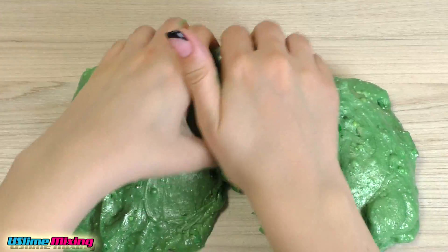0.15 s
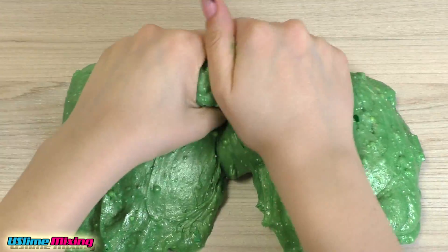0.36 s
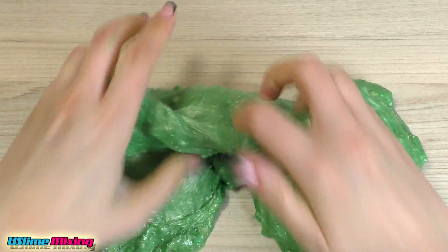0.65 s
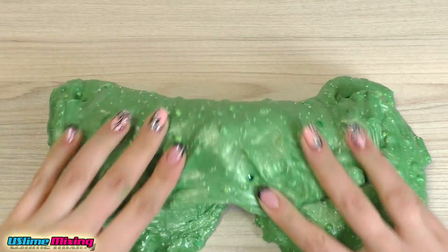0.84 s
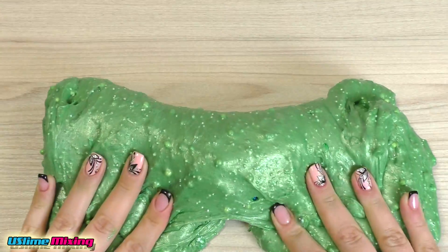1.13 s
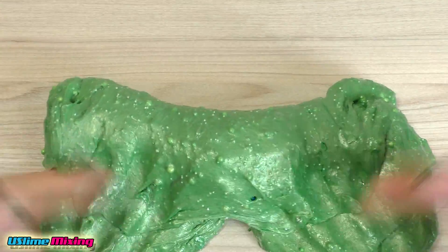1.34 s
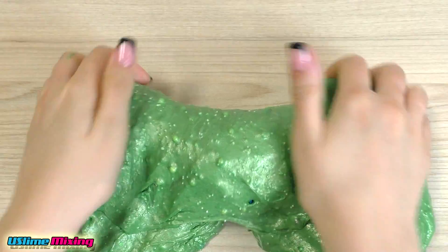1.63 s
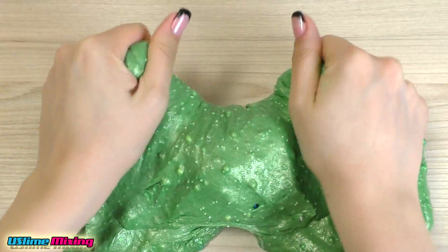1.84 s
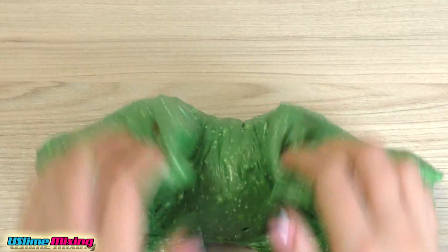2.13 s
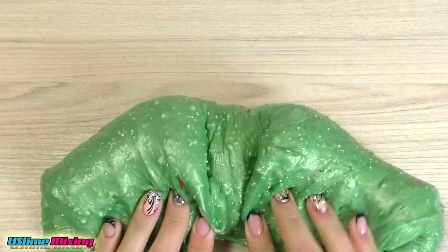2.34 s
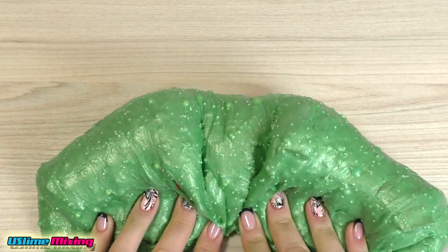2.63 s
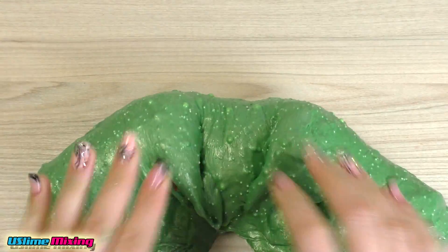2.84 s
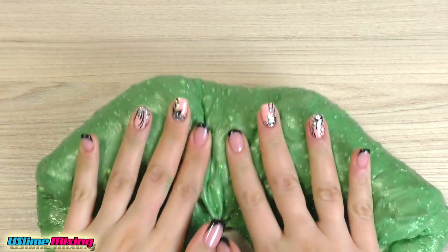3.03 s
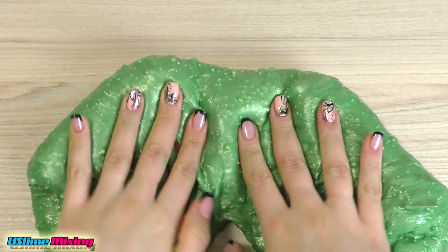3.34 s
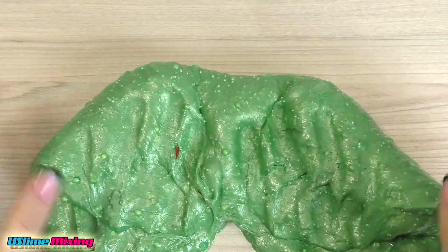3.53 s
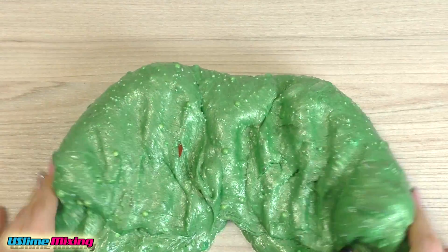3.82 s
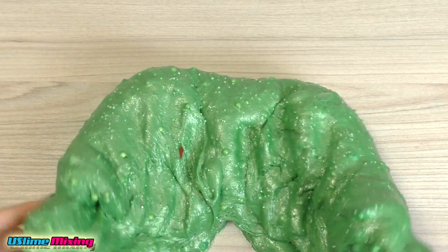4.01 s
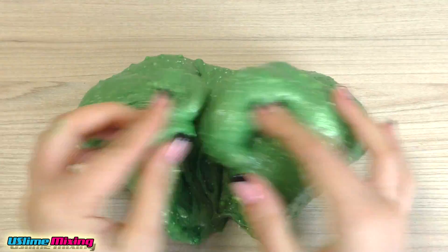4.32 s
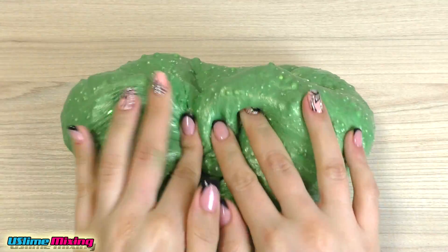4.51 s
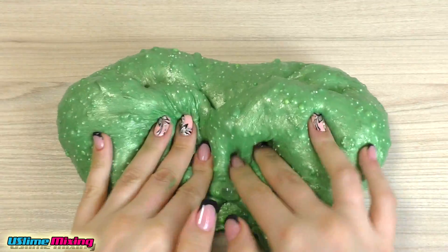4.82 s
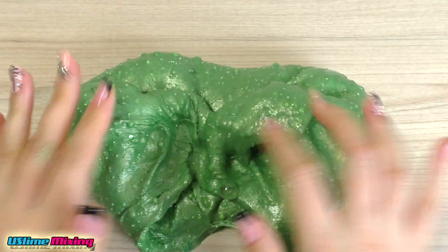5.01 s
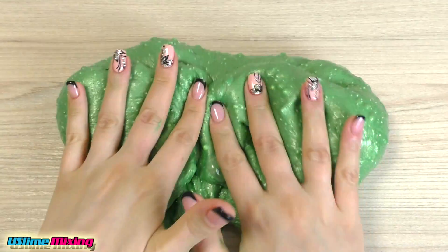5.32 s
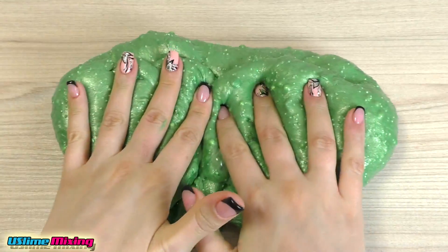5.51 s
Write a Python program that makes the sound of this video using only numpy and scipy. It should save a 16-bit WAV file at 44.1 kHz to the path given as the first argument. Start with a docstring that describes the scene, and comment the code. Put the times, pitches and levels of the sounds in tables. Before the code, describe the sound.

A close stereo take of hands kneading thick, bubbly slime on a wooden table in a small room. At 0 s a short wet tearing fizz sits over a soft thump. From 0.3 to 0.5 s comes the loudest part: a dense run of hollow bubble pops and bright snaps, with tiny squeaks, dull knocks and a hiss of escaping air. A sticky peel and smaller pops follow at 0.6-0.75 s, then near calm. At 1.4 s there is a peel and low thud; from 1.85 to 2.15 s bright, crisp crackling and a swelling rip. Two round, hollow pops land at 2.47 and 2.54 s. A thud and peel come at 2.8 s, soft presses after 3 s, another peel at 3.5 s, and table thumps near 3.7 s. Light crackles return around 3.9-4.25 s, a sharp peel with a thump at 5 s, and a soft push at 5.4 s, over faint hum.

```python
"""First comes a wet tearing fizz over a soft thump, then a lively run of hollow pops and bright snaps.
Two hands press, fold and stretch thick slime on a wooden table: bursting air pockets are decaying sines
with torn-film noise, peeling skin is a fizz of random clicks, and slits leak or whistle banded air.
Pushes sound as swelling, decaying sines: two thud tones and the table modes; a small room returns a
short noise tail of the slime, and its quiet tone and faint hum are filtered noise."""
import sys
import numpy as np
from scipy import signal
from scipy.fft import rfft, irfft, next_fast_len
from scipy.io import wavfile
from scipy.ndimage import uniform_filter1d

SR = 44100
rng = np.random.default_rng(int(sys.argv[2]) if len(sys.argv) > 2 else 0)


def int16_out(signal):
    """Quantize to a 16-bit WAV file."""
    q = np.round(np.clip(np.atleast_2d(signal).T, -1, 1) * 32767)
    wavfile.write(sys.argv[1], SR, q.astype(np.int16))


N = 249606


def undb(db):
    """Decibel definition: level to amplitude ratio."""
    return 10 ** (np.asarray(db) / 20)


def unit(x):
    """Normalisation to an RMS of 1."""
    return x / np.sqrt(np.mean(x ** 2))


def fade(t, t60):
    """Exponential decay by 60 dB in t60 seconds, never shorter than 4 ms."""
    return np.exp(-np.log(1000) * t / max(t60, .004))


def sine(hz, t):
    """Simple harmonic motion from zero phase."""
    return np.sin(2 * np.pi * hz * t)


def band(x, hz, width):
    """Single resonance, gain 1 at the centre."""
    return signal.lfilter(*signal.iirpeak(min(hz, .4 * SR), hz / width, SR), x)


def steep_band(x, hz, width):
    """Cascaded resonances: two equal ones in series have steeper skirts."""
    return band(band(x, hz, width), hz, width)


def colour(x, points):
    """Linear filtering: shapes the spectrum by (frequency [Hz], gain [dB]) points."""
    hz, db = np.transpose(points)
    size = next_fast_len(x.shape[-1])
    log_hz = np.log(np.arange(size // 2 + 1) * SR / size + 1)
    gain = undb(np.interp(log_hz, np.log(hz), db))
    return irfft(rfft(x, size) * gain, size)[..., :x.shape[-1]]


def walk(rate):
    """Slow random modulation: levels held 1 / rate s and smoothed twice, RMS 1."""
    k = int(SR / rate)
    steps = np.repeat(rng.standard_normal(N // k + 1), k)
    return unit(uniform_filter1d(uniform_filter1d(steps, k), k)[:N])


def pan_gain(pan_db):
    """Interchannel level difference, left minus right in dB."""
    return undb(np.array([[pan_db], [-pan_db]]) / 2)


def stereo(mid, side, width):
    """Mid-side principle: the side noise enters the channels with opposite signs."""
    return mid + width * side * np.array([[1], [-1]])


def add(out, s, x, pan_db=0):
    """Superposition of a short sound on both channels at time s."""
    i = max(int(s * SR), 0)
    out[:, i:i + len(x)] += x[:N - i] * pan_gain(pan_db)


def curve(rows):
    """Linear interpolation of (time [s], value, ...) rows, one sampled curve per value column."""
    s, *columns = np.transpose(rows)
    return [np.interp(np.arange(N) / SR, s, c) for c in columns]


# Bursting pockets: (time [s], cavity level [dB], cavity pitch [Hz],
# snap level before a factor 0.3 [dB], snap centre [Hz], left minus right [dB])
POCKET_BURSTS = [(.299, -36.5, 2650, -39, 14700, 1.5), (0.323, -14, 1664, -31, 10700, 0.5),
                 (0.4, -19, 2670, -47, 4570, 4), (0.418, -10, 2220, -18.5, 5040, -3),
                 (.421, -16, 2430, -17.5, 5350, 6), (.4465, -14, 2230, -14.5, 5430, 3.5),
                 (0.448, -23, 1410, -12.5, 8590, 1.5), (.466, -19, 2310, -20.5, 8400, -5.5),
                 (.4793, -8.5, 1530, -1.5, 8800, -0.5), (0.4809, -9, 2060, -5, 9290, 3.5),
                 (0.575, -31.5, 1080, -28.5, 8700, -3.5), (.653, -22.5, 2940, -31, 5100, -2),
                 (.691, -23, 2420, -24, 8150, 1), (.728, -24, 2800, -22.5, 13200, 1),
                 (.743, -13, 2650, -43, 13700, 0.5), (.89, -48, 2020, -42, 10300, -2),
                 (.919, -41.5, 2670, -38, 9740, -3), (1.357, -39.5, 800, -28, 9900, -2),
                 (1.366, -34.5, 824, -26.5, 10400, -2), (1.385, -33, 2240, -23.5, 11600, -1),
                 (1.662, -44.5, 1579, -31, 8400, 2.5), (1.712, -40.5, 2700, -44, 10000, 3.5),
                 (1.754, -36, 2600, -53, 9940, 2), (1.805, -41.5, 2600, -56, 9460, -4),
                 (1.832, -62, 2570, -36, 13700, -1), (1.844, -27, 2530, -15, 6040, 1),
                 (1.8473, -16, 2640, -24, 6840, -2.5), (1.877, -35, 4160, -28, 12000, 4),
                 (1.883, -43, 3930, -30, 6900, -7), (1.937, -32.5, 1820, -47, 5620, 0),
                 (1.942, -33.5, 1140, -29.5, 12600, 4), (1.977, -35, 1070, -45, 14300, -5),
                 (1.992, -17, 1090, -9, 14500, 3), (2.008, -19.5, 4170, -7.5, 12500, 3.5),
                 (2.064, -44, 1050, -22.5, 10100, 2), (2.109, -43, 2890, -20, 13500, 2),
                 (2.117, -29.5, 4400, -15, 12000, -2), (2.124, -33, 4340, -16, 12000, 8),
                 (2.146, -27, 2010, -21.5, 11400, 1), (2.189, -37, 1140, -26.5, 8600, -1),
                 (2.222, -60, 1380, -54, 11100, -6), (2.24, -61, 1400, -53, 11500, 0),
                 (2.252, -61, 1400, -52, 11000, 0), (2.289, -38, 2060, -26, 9800, -3.5),
                 (2.354, -40.5, 1950, -47.5, 7930, -1), (2.384, -49, 1950, -33, 11000, 0),
                 (2.418, -43, 1810, -48, 13100, -1), (2.4701, -4, 1240, -32, 4700, -3.5),
                 (2.5364, -12.5, 1274, -30, 4230, 4.5), (2.584, -35, 2630, -33.5, 4300, -1.5),
                 (2.672, -59, 1200, -45, 8700, 0), (2.717, -33.5, 2200, -45, 4330, 1),
                 (2.768, -44.5, 1060, -39, 11740, 1), (2.802, -44, 2040, -33, 8730, 1),
                 (3.486, -40, 1880, -29, 10200, -.5), (3.916, -39.5, 2520, -39, 13300, 9),
                 (3.936, -30.5, 3180, -39, 12000, 3), (3.986, -34, 2700, -32.5, 12700, 7),
                 (4.027, -29, 2130, -33, 5200, 2), (4.037, -25, 2100, -31, 4900, 4),
                 (4.127, -38.5, 2170, -51, 5560, 8), (4.148, -32.5, 1740, -44, 4930, -4),
                 (4.2, -40, 2050, -32, 12800, 4), (4.239, -43, 2000, -32.5, 12600, 3),
                 (4.412, -48.5, 1190, -55, 8450, 0), (4.458, -48.5, 1870, -63.5, 9580, -1),
                 (4.474, -44, 2500, -58, 10360, 2.5), (4.511, -50.5, 1990, -65, 12200, 1),
                 (4.559, -51, 2270, -48, 13700, 1), (4.708, -52.5, 1020, -52.5, 8300, 2),
                 (4.733, -49, 2160, -50.5, 7640, -.5), (4.752, -54, 1067, -50, 8400, -2),
                 (4.798, -66.5, 1203, -54, 6250, 1), (4.819, -52.5, 1204, -63, 4830, -4),
                 (4.882, -53.5, 1370, -62.5, 14400, -4), (4.977, -50, 1034, -29, 6000, -.5),
                 (5.421, -43, 3380, -39.5, 10700, 1), (5.427, -45, 890, -72.5, 9930, -4),
                 (5.539, -59, 1230, -53, 11300, .5)]
# Bursts change with level: the rise is slowest at middling cavity levels and sudden in the strongest;
# the loudest fizz on least: (burst level [dB], snap rise [s], snap t60 [s],
# t60 of a 2 kHz cavity [s], cavity afterfizz [dB], snap afterfizz [dB])
BURST_LAWS = [(-46.5, 0.0013, 0.04, 0.012, -16, -21), (-32.5, 0.0035, 0.016, .010, -17.5, -17.5),
              (-20, 0.0042, 0.064, 0.012, -17.5, -18.5), (-14, 0.00036, 0.031, 0.0064, -22, -21.5),
              (-2, 0.00022, 0.024, 0.0077, -35.5, -28.5)]
# Partials of the cavity: (multiple of the cavity pitch [1], level relative to the main tone [dB])
CAVITY_PARTIALS = [(.62, -14.5), (1.45, -8.5), (2.2, -21), (3.6, -23)]
CAVITY_PITCH_LAW = 0.89  # lower cavities ring longer: t60 goes with pitch to the minus this power


def cavity(t, hz, t60_2khz, after_db, noise):
    """Cavity resonance: damped partials, then weak noise around the same pitch."""
    ring = sine(hz, t)
    for multiple, db in CAVITY_PARTIALS:
        ring += undb(db) * sine(multiple * hz, t)
    onset = np.minimum(t * hz, 1)  # one cycle long
    ring *= fade(t, t60_2khz * (2000 / hz) ** CAVITY_PITCH_LAW) * onset
    return ring + undb(after_db) * afterfizz(t) * unit(steep_band(noise, hz, 0.88 * hz))


def snap(t, hz, rise, t60, after_db, noise, rough_noise):
    """Film rupture: the tear gathers, peaks in one sharp tick and dies away raggedly."""
    film = band(noise, hz, 0.15 * hz) + 0.27 * steep_band(noise, hz, 1.3 * hz)
    film = unit(film + 0.17 * band(noise, 12500, 6000))
    ragged = unit(undb(4.5 * unit(uniform_filter1d(rough_noise, size=12))))
    tick = 0.21 * np.exp(-np.abs(t - rise) / 0.00023)
    tear = np.minimum(t / rise, 1) ** 2 * (fade(np.maximum(t - rise, 0), t60) + tick)
    return film * (tear * ragged + undb(after_db) * afterfizz(t))


def afterfizz(t):
    """Exponential decay of the weak fizz after a burst, with a 2 ms onset."""
    return fade(t, 0.13) * np.minimum(t / .002, 1)


def pops():
    """Bubble bursting: each pocket rings its cavity and tears its film."""
    out, t = np.zeros((2, N)), np.arange(int(.15 * SR)) / SR
    strength_db, rise_law, *other_laws = np.transpose(BURST_LAWS)
    for s, cavity_db, cavity_hz, snap_db, snap_hz, pan_db in POCKET_BURSTS + faint_pops():
        strongest_db = max(cavity_db, snap_db)
        snap_t60, cavity_t60, cavity_after_db, snap_after_db = (
            np.interp(strongest_db, strength_db, law) for law in other_laws)
        # the rise goes by the cavity level alone
        rise = np.interp(cavity_db, strength_db, rise_law)
        noise = rng.standard_normal((3, len(t)))
        ring = cavity(t, cavity_hz, cavity_t60, cavity_after_db, noise[0])
        film = snap(t, snap_hz, rise, snap_t60, snap_after_db, noise[1], noise[2])
        add(out, s, undb(cavity_db) * ring + 0.3 * undb(snap_db) * film, pan_db)
    return out


FAINT_PER_S, FAINT_DB, FAINT_SPREAD_DB = 12, 18, 4.5  # highest level above the coarse fizz; half the range


def faint_pops():
    """Poisson process: rows for small random pockets whose level follows the stretching."""
    when, pitch, bright, size, tilt, side = rng.random((100, 6)).T
    s = np.cumsum(-np.log(1 - when)) / FAINT_PER_S
    coarse_db = np.interp(s, *np.transpose(STRETCHING)[:2])
    db = coarse_db + FAINT_DB - FAINT_SPREAD_DB * 2 * size
    cavity_hz, snap_hz = 1000 + 1700 * pitch, 5000 + 9000 * bright
    rows = np.transpose([s, db, cavity_hz, db - 12 * tilt, snap_hz, 8 * (side - .5)])
    return list(rows[s < N / SR])


# Low, dull tones, some under the pops: (time [s], pitch [Hz], level [dB], t60 [s])
DULL_TONES = [(.3215, 339, -12, 0.018), (.3225, 628, -17, 0.018), (.4795, 400, -22, 0.019),
              (0.4804, 1040, -17, 0.0093), (.418, 1180, -25.5, 0.017), (.448, 1041, -28.5, 0.015),
              (2.4705, 890, -18.5, 0.012), (2.718, 990, -41.5, 0.015), (2.538, 636, -17.5, 0.0047),
              (3.057, 569, -57.5, 0.0506), (5.327, 400, -45.5, 0.027), (5.428, 425, -38.5, 0.039)]


def dull_tones():
    """Damped oscillation: each is one dull, decaying sine."""
    out, t = np.zeros((2, N)), np.arange(int(.15 * SR)) / SR
    for s, hz, db, t60 in DULL_TONES:
        add(out, s, undb(db) * sine(hz, t) * fade(t, t60))
    return out


def bursts():
    """Radiation efficiency: small sources radiate little bass, so pops and dull tones are high-passed."""
    bass_cut = signal.butter(2, 170, "high", fs=SR, output="sos")
    return signal.sosfilt(bass_cut, pops() + dull_tones())


# Spectrum of the coarse bubbles: (frequency [Hz], relative gain [dB])
COARSE_SPECTRUM = [(290, -32.5), (500, -4), (603, -13), (1010, 1.5), (1390, -0.5), (1520, -0.5), (2810, 0),
                   (4040, -12), (6000, -13.5), (7800, -48.5), (13200, -120)]
# Spectrum of the fine bubbles: (frequency [Hz], relative gain [dB])
FINE_SPECTRUM = [(2350, -36.5), (4000, -4.5), (4390, -3.5), (4990, -5), (6400, -7), (7100, -2.5),
                 (12500, -0.5), (14100, -4.5), (16000, -12.5)]


def fizz(points, spread_db, hiss):
    """Shot noise: tiny bubbles of unequal size click with short tails over a wet, flickering hiss."""
    sizes = undb(spread_db * np.minimum(rng.exponential(size=N), 3.5))
    clicks = (rng.random(N) < 500 / SR) * sizes  # 500 bubbles per s on average
    tails = signal.lfilter([1], [1, -np.exp(-1 / (0.0048 * SR))], clicks)
    puffs = tails * rng.standard_normal(N)
    mid, side = rng.standard_normal((2, N))
    wet = unit(puffs) + hiss * stereo(mid, side, 0.64)
    return unit(colour(wet, points) * undb(1.2 * walk(40)))


# Sticky fizz while the slime is stretched: (time [s], coarse bubbles [dB], fine bubbles [dB])
STRETCHING = [(0, -54, -66), (.16, -70, -95), (.31, -67.5, -63.5), (.37, -46.5, -56.5), (.5, -55, -43),
              (.63, -58.5, -51), (.9, -63.5, -65.5), (1.1, -69.5, -67), (1.45, -92, -97),
              (1.72, -64.5, -62.5), (1.91, -54, -52), (2.08, -48, -41), (2.24, -67, -56.5),
              (2.55, -56.5, -69), (2.9, -76, -76), (3.6, -74, -86.5), (3.95, -60, -58.5),
              (4.26, -63.5, -55.5), (4.5, -69.5, -70.5), (5.66, -79, -81.5)]
# Hands and folds tearing free, a swelling fizz each: (time [s], hold [s], coarse bubbles [dB],
# fine bubbles [dB], fade [dB/s], left minus right [dB])
TEARING_FREE = [(0, 0.0036, -46, -40.5, 409, 0.5), (0.67, 0.074, -42.5, -39.5, 248, 0),
                (0.913, 0.018, -63.5, -54, 397, -1), (1.372, 0.034, -44.5, -43.5, 380.5, -0.5),
                (2.105, 0.053, -46, -39, 221, 0), (2.81, 0.013, -41.5, -42.5, 421.5, -0.5),
                (3.489, 0.024, -47, -44.5, 293, -0.5), (3.956, .12, -49, -53, 200, 1),
                (4.139, 0.1, -56, -60.5, 124, -2.5), (4.989, 0.021, -41, -41, 549, -0.5)]
TEAR_RISE_DB_PER_S, TEAR_TAIL_DB, TEAR_TAIL_DB_PER_S = 512, -21.5, 128


def peel():
    """Adhesive peeling: coarse and fine fizz follow the pull of the hands, with a lower squish."""
    coarse, fine = (np.tile(undb(db), (2, 1)) for db in curve(STRETCHING))
    t = np.arange(N) / SR
    for s, hold, coarse_db, fine_db, fade_db, pan_db in TEARING_FREE:
        since = np.maximum(t - s - hold, 0)
        swell = undb(-TEAR_RISE_DB_PER_S * np.maximum(s - t, 0))
        decay = undb(-fade_db * since) + undb(TEAR_TAIL_DB - TEAR_TAIL_DB_PER_S * since)
        shape = swell * decay * pan_gain(pan_db)
        # independent noises add in power
        coarse = np.hypot(coarse, shape * undb(coarse_db))
        fine = np.hypot(fine, shape * undb(fine_db))
    squish = undb(-8) * coarse * unit(steep_band(rng.standard_normal(N), 380, 260))
    coarse = coarse * fizz(COARSE_SPECTRUM, spread_db=4.2, hiss=.7)
    fine = fine * fizz(FINE_SPECTRUM, spread_db=4.5, hiss=.8)
    return coarse + fine + squish


# Air hissing out of a fold: (time [s], length [s], centre [Hz], width of each of two resonances [Hz],
# start level [dB], end level [dB])
FOLD_LEAKS = [(0.486, 0.13, 8700, 900, -37, -52.5), (.49, .13, 6200, 900, -49, -59),
              (.488, .12, 11500, 1500, -46, -58), (1.356, 0.026, 880, 300, -48, -57),
              (1.35, .055, 2200, 500, -52, -47.5), (1.85, 0.1, 6440, 2300, -44, -55),
              (2.805, 0.032, 2070, 320, -54, -55), (2.06, 0.063, 11900, 2510, -47, -38),
              (2.49, 0.07, 1280, 600, -39, -39.5), (2.471, 0.074, 4600, 804, -65, -68),
              (2.595, 0.025, 4400, 700, -63, -68.5), (4.172, 0.21, 2200, 300, -56.5, -69.5),
              (4.42, 0.022, 8800, 4000, -60, -59), (4.818, 0.036, 1500, 890, -58.5, -85.5),
              (0.3, 0.083, 910, 1800, -52, -55), (5.439, 0.081, 1276, 905, -68, -65.5)]


def leaks():
    """Jet noise: a slit's resonance narrows the noise to one gurgling band with a gliding level."""
    out = np.zeros((2, N))
    for s, length, hz, width, start_db, end_db in FOLD_LEAKS:
        jet = unit(steep_band(rng.standard_normal(SR // 2), hz, width))[-int(length * SR):]
        gurgle = undb(2 * unit(uniform_filter1d(rng.standard_normal(len(jet)), size=200)))
        level = undb(np.linspace(start_db, end_db, len(jet)))
        add(out, s, gurgle * jet * level * signal.windows.tukey(len(jet), .2))
    return out


# Air squeezed out through a slit: (time [s], length [s], start pitch [Hz], end pitch [Hz], level [dB])
SLIT_SQUEAKS = [(.401, .016, 3100, 2400, -25), (.428, .019, 1700, 1900, -28), (.424, .023, 3400, 3600, -32),
                (.438, .024, 5200, 5300, -30)]


def squeaks():
    """Frequency modulation: short gliding whistles of uneven strength."""
    out = np.zeros((2, N))
    for s, length, start_hz, end_hz, db in SLIT_SQUEAKS:
        hz = np.linspace(start_hz, end_hz, int(length * SR))
        rough = 1 + .35 * unit(uniform_filter1d(rng.standard_normal(len(hz)), size=80))
        whistle = np.sin(2 * np.pi * np.cumsum(hz) / SR)
        add(out, s, undb(db) * np.sqrt(np.hanning(len(hz))) * rough * whistle)
    return out


# Pushes of the palms: (time [s], low tone level [dB], low tone pitch [Hz],
# upper tone level [dB], upper tone pitch [Hz], table level [dB])
PALM_PUSHES = [(.004, -43.5, 315, -42, 367, -44), (0.324, -37, 323, -26, 392, -41),
               (.391, -30, 305, -25.5, 436, -72), (.57, -45.5, 294, -49, 388, -65),
               (.663, -47, 269, -52, 403, -54), (.724, -54, 310, -38, 389, -50),
               (1.383, -28, 310.2, -40, 348, -55), (1.397, -29.5, 301.7, -47, 348, -59),
               (1.777, -56, 329, -65, 360, -53), (1.965, -46.5, 279, -40.5, 460, -63),
               (2.07, -38.5, 323, -46, 417, -48.5), (2.114, -34.5, 318, -29.5, 412, -50.5),
               (2.469, -46.5, 324, -40, 408, -40.5), (2.535, -38, 342, -29.5, 506, -51),
               (2.804, -23, 293, -30, 357, -54), (2.824, -24.5, 262.3, -43, 347.7, -41),
               (2.854, -37, 267.4, -40, 425, -55), (3.045, -48.5, 338, -51.5, 351, -68),
               (3.086, -52.5, 338.5, -55, 361, -74), (3.134, -56, 311.7, -54, 394, -76.5),
               (3.217, -55.5, 318, -44.5, 400, -66), (3.475, -38, 310, -66.5, 353, -64),
               (3.507, -43, 270, -44, 550, -43.5), (3.558, -51.5, 282, -47, 474, -59),
               (3.716, -35.5, 75, -46, 298, -52), (3.73, -48.5, 315, -65, 390, -39),
               (3.765, -56, 262, -60, 470, -44), (3.799, -61, 235, -62, 424, -48.5),
               (3.928, -50, 251, -45, 444, -59), (4.311, -67, 231, -45.5, 440, -69),
               (4.472, -59, 312, -47.5, 397, -75), (4.918, -64, 315, -48, 444, -71.5),
               (4.966, -36.5, 301.5, -35.5, 464, -57), (4.995, -33.5, 309, -45, 487, -34),
               (5.317, -50, 338.6, -46, 361, -67.5), (5.421, -44.5, 324, -31.5, 409.4, -65)]
# Modes of the table top: (frequency [Hz], level relative to the table level [dB], t60 [s])
TABLE_MODES = [(99, -6.5, 0.29), (119.5, 4.5, 0.28), (159, -14.5, 0.33)]
PUSH_RISE_S, LOW_T60_S, UPPER_T60_S = 0.016, 0.14, .09
THUD_PAN_DB = 4  # standard deviation of left minus right


def thuds():
    """Modal excitation: a soft push swells two wobbling thud tones and the table-top modes."""
    out, t = np.zeros((2, N)), np.arange(int(.4 * SR)) / SR
    swell = np.sin(np.pi / 2 * np.minimum(t / PUSH_RISE_S, 1)) ** 2
    for s, low_db, low_hz, upper_db, upper_hz, table_db in PALM_PUSHES:
        wobbles = uniform_filter1d(rng.standard_normal((2, len(t))), size=400)
        pan_db = THUD_PAN_DB * rng.standard_normal()
        tones = ((low_hz, low_db, LOW_T60_S), (upper_hz, upper_db, UPPER_T60_S))
        for (hz, db, t60), wobble in zip(tones, wobbles):
            level = undb(db + 3.3 * unit(wobble))
            add(out, s, level * swell * fade(t, t60) * sine(hz, t), pan_db)
        for hz, db, t60 in TABLE_MODES:
            add(out, s, undb(table_db + db) * swell * fade(t, t60) * sine(hz, t))
    return out


ROOM_T60_S, ROOM_DB = .13, -16


def room(x):
    """Diffuse reverberation: a decaying noise tail of the near walls, partly different left and right."""
    t = np.arange(int(.35 * SR)) / SR
    # the first reflections arrive after 3 ms
    mid, side = rng.standard_normal((2, len(t))) * fade(t, ROOM_T60_S) * (t > .003)
    tail = stereo(mid, side, .5) / np.sqrt(np.sum(mid ** 2))
    mono = x.mean(axis=0, keepdims=True)
    return undb(ROOM_DB) * signal.fftconvolve(mono, tail, axes=1)[:, :N]


# Spectrum of the room tone: (frequency [Hz], relative gain [dB])
AIR_SPECTRUM = [(15, -43.5), (25, -17.5), (64, -15.5), (145, -9), (212, -12.5), (405, -15.5), (659, -28.5),
                (840, -23.5), (1480, -23.5), (2220, -25), (2410, -33.5), (2840, -26), (5570, -49.5),
                (11300, -38), (16000, -40.5)]
# Hum bands: (centre [Hz], width of each of two resonances [Hz], level [dB])
HUM_BANDS = [(120, 11, -75.5), (153.45, 5.7, -72.5), (320, 120, -77)]
AIR_DB = -65


def air():
    """Background noise: wavering room tone, mostly different left and right, and a hum alike in both."""
    mid, side = colour(rng.standard_normal((2, N)), AIR_SPECTRUM)
    sound = undb(AIR_DB + walk(4.5)) * unit(stereo(mid, side, 0.92))
    for hz, width, db in HUM_BANDS:
        hum = unit(steep_band(rng.standard_normal(N), hz, width))
        sound = sound + undb(db + 4.9 * walk(2.8)) * hum
    return sound


def scene():
    """Superposition: slime with its reverberation, table thuds and room tone."""
    slime = bursts() + peel() + leaks() + squeaks()
    return slime + room(slime) + thuds() + air()


def record(dry):
    """Band limitation: the recorder cuts the top above 15.7 kHz with a steep elliptic low-pass."""
    return signal.sosfilt(signal.ellip(10, .2, 70, 15700, fs=SR, output="sos"), dry)


dry = scene()
out = record(dry)
int16_out(out)
```